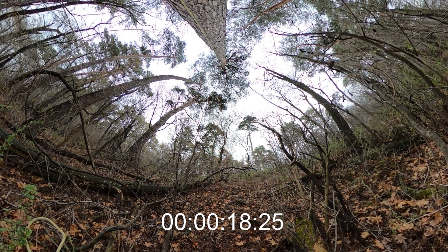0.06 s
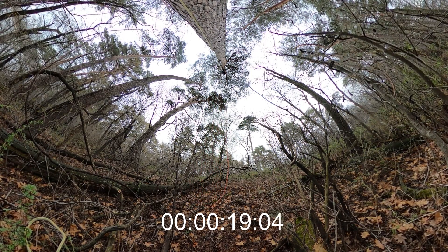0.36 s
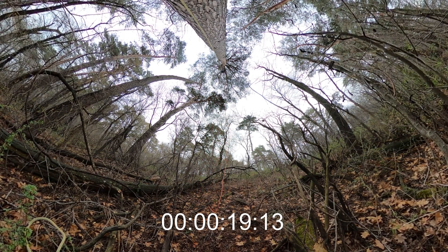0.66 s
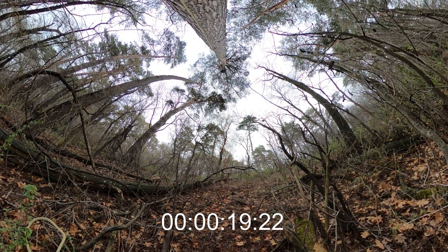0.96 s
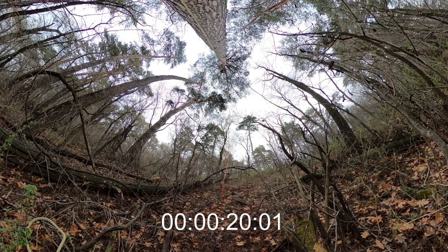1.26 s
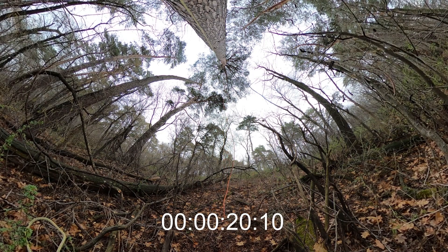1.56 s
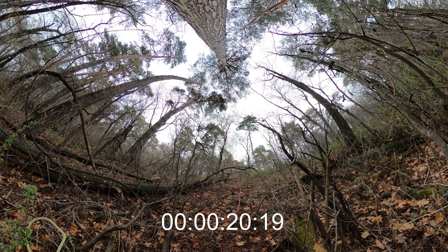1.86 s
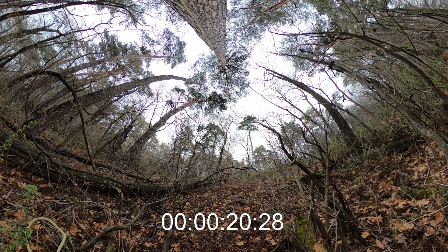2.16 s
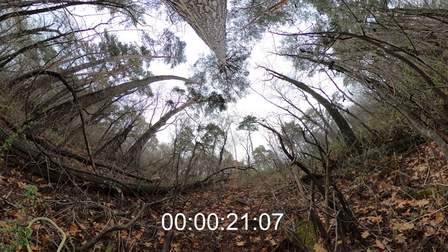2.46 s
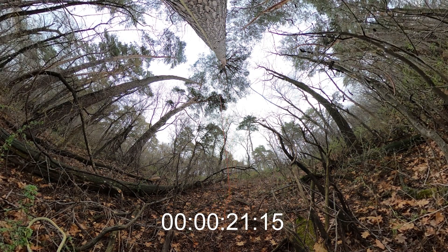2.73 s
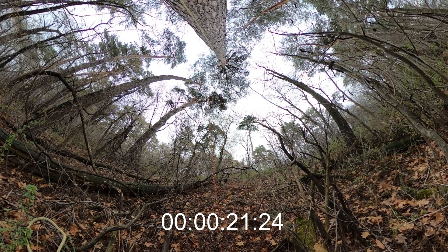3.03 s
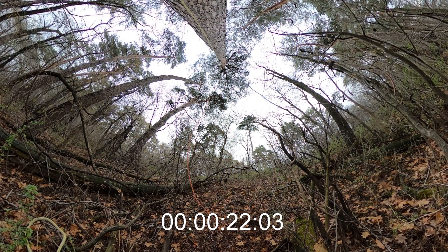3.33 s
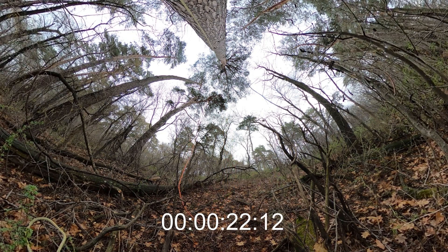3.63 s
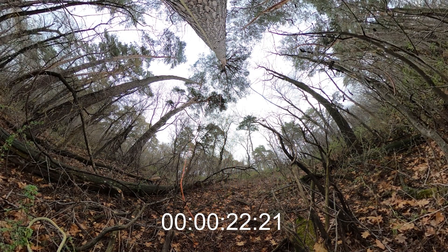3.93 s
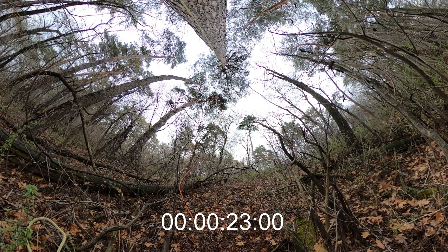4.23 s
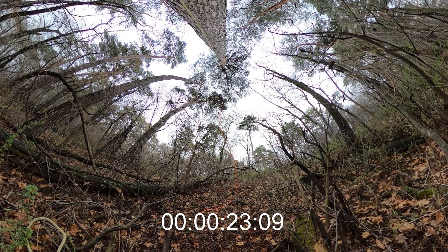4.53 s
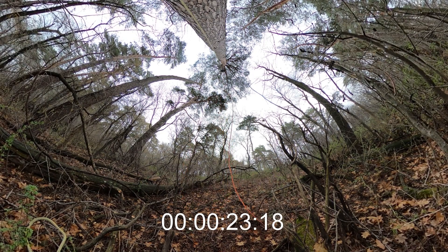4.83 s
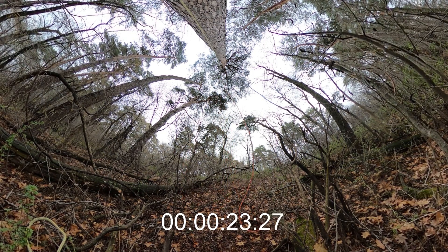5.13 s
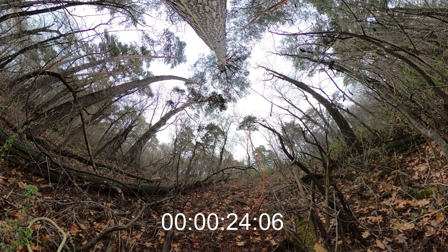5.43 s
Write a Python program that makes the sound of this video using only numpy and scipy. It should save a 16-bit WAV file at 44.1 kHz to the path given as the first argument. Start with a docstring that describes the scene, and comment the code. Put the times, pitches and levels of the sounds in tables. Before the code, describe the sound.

A straining tree trunk creaks and cracks irregularly, then branches snap close by and it thuds down, with faint birds and a low rumble behind.

```python
"""A winter forest, where a tree gives way. The strained trunk squeaks by stick-slip friction and cracks at
intervals, each big crack knocking through the ground just before it arrives through the air. Then
branches snap close by and the stem thuds down, overloading the microphone. Trunks scatter the sound
into a short echo. Far traffic rumbles over a low hum, small birds call and faint hoots come from afar."""
import sys
import numpy as np
from scipy import signal
from scipy.fft import rfft, irfft
from scipy.io import wavfile

SR = 44100
rng = np.random.default_rng(int(sys.argv[2]) if len(sys.argv) > 2 else 0)


def digitize_waveform(pressure):
    """Quantize a signal to 16-bit integers and store it at the path in sys.argv[1].

    Rows of a 2-D input are taken as channels; values are limited to [-1, 1].
    """
    field = np.atleast_2d(pressure).T
    bounded = np.clip(field, -1, 1)
    quanta = np.round(bounded * 32767).astype(np.int16)
    wavfile.write(sys.argv[1], SR, quanta)


N = 250884

# spectrum of far traffic: frequency_hz, relative_density_db
TRAFFIC_SPECTRUM = [(20, -4.5), (40, -4), (62, -1.5), (90, -5.5), (135, -9.5), (180, -12.5), (280, -18.5),
                    (420, -20.5), (700, -18.5), (1600, -20.5), (2400, -38), (5000, -48.5), (9500, -54),
                    (12000, -78)]
# course of the tyre noise: time_s, level_db
TYRE_LEVEL = [(0.0, -45.5), (0.58, -43.5), (1.62, -44.5), (2.23, -47), (2.81, -43), (3.13, -45.5),
              (3.55, -43), (3.98, -46.5), (4.29, -41.5), (4.45, -45), (5.1, -46)]
# course of the low hum: time_s, level_db
HUM_LEVEL = [(0, -38), (.6, -45.5), (1.2, -51), (2.0, -46.5), (2.8, -50.5), (3.3, -42), (3.8, -44),
             (4.5, -43), (5.69, -55)]
# faint low hoots: start_s, length_s, start_hz, end_hz, level_db
FAR_HOOTS = [(0.0, 0.046, 385, 395, -46), (.98, 0.18, 319.4, 334, -55), (4.62, 0.165, 335.5, 350, -52)]
# thin bird calls: start_s, length_s, start_hz, end_hz, relative_level_db
BIRD_CHIRPS = [(0.0, 0.017, 7530, 7400, -58.5), (.17, 0.081, 8970, 8800, -67),
               (0.905, 0.036, 7460, 7250, -60), (1.002, 0.05, 7400, 7250, -58),
               (1.087, 0.0043, 7480, 6820, -36.5), (1.095, 0.036, 7340, 7150, -51),
               (1.81, 0.048, 7880, 7830, -55), (1.825, 0.034, 7200, 6720, -60),
               (1.926, 0.057, 6920, 7630, -52), (2.663, 0.03, 7500, 7450, -53),
               (4.582, 0.021, 7250, 6860, -60), (4.726, 0.076, 7340, 7130, -60)]
# colour of the forest echo: frequency_hz, relative_gain_db
ECHO_SPECTRUM = [(200, 3.5), (600, -2), (1500, 2), (3000, 1), (6000, 1.5), (10000, 0), (15000, -1.5)]
# reverberation time of the forest: frequency_hz, t60_s
ECHO_DECAY = [(200, 0.55), (800, 0.24), (2000, 0.47), (5500, 0.5), (10000, 0.54), (15000, 0.44)]
# echo of the breaking wood, which sinks as the breaks come close: time_s, relative_gain_db
ECHO_SHARE = [(0, -4.5), (1.7, -3.5), (3.3, -2.5), (3.7, -10.5), (4.17, -9.5), (4.84, -4.5), (5.18, -3.5),
              (5.35, -16), (5.45, -20.5), (5.65, -16)]
# modes of the trunk: pitch_ratio, gain_db
TRUNK_MODES = [(0.759, -8), (0.999, 0), (1.42, -13.5), (2.05, -14.5), (2.9, -24), (3.9, -47)]
# blows carried by trunk and ground: start_s, mode_peak_db, base_pitch_hz, swell_s, relative_crunch_db
GROUND_KNOCKS = [(1.707, -19.5, 204, 0.0037, -10), (1.728, -29.5, 189.6, 0.014, -13),
                 (2.716, -32.5, 200, 0.0077, -2.5), (2.715, -31.5, 1024, 0.011, -20),
                 (3.683, -27, 242, 0.0022, 2), (4.149, -15.5, 249, 0.0066, -6),
                 (4.158, -28, 354, 0.0085, -15), (4.161, -20.5, 274.4, 0.012, -21),
                 (4.183, -21, 211.5, 0.014, -28), (5.442, -19.5, 234, 0.0034, -1),
                 (5.570, -27, 330, 0.0019, -10), (5.596, -18.5, 267, 0.0047, -16),
                 (5.634, 2, 244.3, 0.0089, -25), (5.660, -19, 258, 0.0084, -21)]
# limbs and stem hitting the soil: start_s, mode_peak_db, base_pitch_hz, swell_s, relative_crunch_db
SOIL_THUDS = [(4.150, -19.5, 75, 0.008, -24), (5.247, -27.5, 43.1, 0.05, -18),
              (5.325, -28.5, 75.2, 0.04, -37), (5.455, -12.5, 54, 0.0086, -34),
              (5.51, -22.5, 49, 0.011, -35), (5.578, -16.5, 93, 0.01, -12),
              (5.604, -0.5, 84.2, 0.012, -21.5), (5.646, 0, 46.2, 0.016, -20)]
# strained wood, by its strongest harmonic:
# start_s, end_s, start_hz, end_hz, level_db, relative_others_db, relative_echo_db, waver_ratio
WOOD_SQUEAKS = [(1.524, 1.613, 3210, 3180, -48.5, -22.5, -1.5, 0.0041),
                (1.595, 1.697, 3120, 3100, -42.5, -22, -5, 0.0057),
                (1.674, 1.795, 3127, 3010, -45, -27, -9.5, 0.013),
                (1.653, 1.787, 5560, 5410, -55.5, -37, -0.5, 0.021),
                (2.813, 2.905, 3350, 3530, -46.5, -25, -6, 0.015),
                (2.97, 3.067, 3765, 3650, -54, -22, -7, .003),
                (3.117, 3.326, 3700, 3730, -56.5, -14, -19, 0.0043),
                (3.44, 3.74, 3125, 3160, -57.5, -34, -3, 0.0062),
                (4.456, 4.49, 3380, 3440, -61, -24, 2, 0.026),
                (4.645, 4.683, 3400, 3600, -53, -16, -5, 0.044)]
# spells of fibres and twigs tearing: start_s, length_s, level_db
TEAR_SPELLS = [(0, 0.021, -51), (0.163, 0.072, -56), (0.302, 0.048, -53), (0.902, 0.014, -51),
               (0.971, 0.041, -48.5), (1.08, 0.098, -45), (1.165, 0.085, -55), (1.421, 0.038, -44.5),
               (1.584, 0.042, -44), (1.66, 0.28, -64), (1.952, 0.051, -52.5), (2.03, 0.19, -57),
               (2.54, 0.16, -49), (2.82, 0.038, -38), (2.884, 0.061, -50.5), (3.066, 0.027, -41.5),
               (3.27, 0.029, -40), (3.383, 0.21, -52), (3.658, 0.022, -35), (3.72, .012, -52),
               (3.967, 0.26, -55), (4.186, 0.081, -42.5), (4.448, 0.026, -50.5), (4.566, 0.23, -54.5),
               (4.85, 0.15, -57), (5.013, .03, -54.5), (5.177, 0.016, -33), (5.237, 0.045, -30),
               (5.346, 0.04, -35.5), (5.427, 0.061, -28.5), (5.56, 0.01, -21.5), (5.62, .03, -34.5)]
# colour of the tearing: frequency_hz, relative_gain_db
TWIG_SPECTRUM = [(500, -8), (1200, 4), (2200, 4.5), (3600, -2.5), (5500, 4.5), (7500, -1.5), (10000, -9.5),
                 (11500, -18), (15500, -37)]
# colour that all breaks share: frequency_hz, gain_db
WOOD_SPECTRUM = [(60, 16), (300, 6.5), (900, 10.5), (2500, 8), (6000, 5.5), (9700, 2.5), (12000, -13.5)]
# wood breaking: start_s, relative_level_db, pitch_hz, skirt_db_per_octave, decay_s
FRACTURES = [(0.373, -35.5, 5760, 15, .0016), (1.1115, -27, 8240, 16, 0.00069),
             (1.1857, -31.5, 3420, 7.5, .002), (1.193, -37.5, 4560, 6, .0024),
             (1.4283, -34.5, 2280, 10.5, 0.0031), (1.468, -35.5, 4840, 26, .0065),
             (1.6069, -33, 2720, 10, .0028), (1.725, -25.5, 1330, 6.5, 0.0051),
             (1.7322, -28, 1320, 7.5, 0.0017), (1.801, -33.5, 1480, 12, 0.0054),
             (1.993, -42, 5750, 18, .002), (2.0393, -43.5, 4670, 20, 0.0023),
             (2.1694, -32, 1300, 14, .0045), (2.596, -31.5, 2140, 9.5, 0.00085),
             (2.7485, -20, 5000, 5, 0.001), (2.7526, -17, 1490, 7.5, .002),
             (2.8288, -32.5, 5200, 10, 0.0075), (3.088, -27.5, 2720, 13, 0.00093),
             (3.285, -26, 1740, 4.5, .005), (3.2966, -30.5, 4500, 0.5, 0.0088),
             (3.351, -30, 2740, 10, .005), (3.3942, -36.5, 3100, 6, 0.0065), (3.5072, -29, 1270, 13, 0.012),
             (3.5396, -34.5, 1380, 9, 0.0039), (3.6736, -31, 4810, 11, 0.0065),
             (3.6782, -31, 6090, 9, 0.0044), (3.684, -22, 2200, 14, 0.0034), (3.727, -39, 3900, 14, .003),
             (3.8204, -38.5, 3460, 6, 0.01), (3.8678, -30, 4100, 10.5, 0.0026),
             (4.1671, -9, 2040, 17, 0.0016), (4.1737, -10.5, 1110, 7, 0.004),
             (4.1824, -19.5, 4500, 7.5, 0.00099), (4.1881, -26, 2200, 3.5, 0.014),
             (4.645, -45, 4200, 6, 0.0029), (4.778, -41, 6690, 5, 0.0022), (4.802, -39.5, 2580, 26, 0.0058),
             (4.837, -33.5, 1820, 2, 0.012), (5.025, -43.5, 4000, 4, 0.002),
             (5.1283, -38.5, 1350, 10.5, 0.005), (5.183, -26, 5570, 4.5, 0.0028),
             (5.2331, -25.5, 4400, 2.5, 0.0046), (5.2527, -24, 5530, 5, 0.0066),
             (5.2629, -36, 2010, 3, 0.0055), (5.2735, -24, 6760, 6, 0.0023),
             (5.2842, -14.5, 3230, 8, 0.0064), (5.3387, -16.5, 5700, 14.5, 0.0049),
             (5.347, -22.5, 4950, 11, 0.0046), (5.358, -31, 4070, 16, .0026),
             (5.4186, -24.5, 2050, 7, 0.0056), (5.4306, -27.5, 3360, 5, .0055),
             (5.442, -12, 1940, 25, .0016), (5.4429, -9, 1890, 9.5, 0.0071),
             (5.4516, -23.5, 2000, 1.5, 0.013), (5.4655, -19, 4740, 10, 0.011),
             (5.4783, -3, 3740, 30, 0.0045), (5.4803, -29, 4450, 13, 0.0055),
             (5.4869, -13.5, 3220, 32, 0.0013), (5.4923, -11.5, 3630, 27, .0035),
             (5.4963, -6.5, 4900, 12.5, 0.0032), (5.534, -26.5, 3800, 2.5, 0.0081),
             (5.5698, -7.5, 7650, 23, .002), (5.573, -12.5, 7450, 3.5, 0.0038),
             (5.6131, -19, 2560, 33, .0024), (5.6245, -8, 1350, 12, 0.0026),
             (5.627, -8.5, 1830, 15, 0.0054), (5.6339, -5.5, 1260, 12, 0.0048),
             (5.6482, -12.5, 1540, 11.5, 0.00065), (5.6539, -14, 1410, 17, 0.0025)]


def from_db(db):
    """Amplitude grows tenfold for every 20 dB."""
    return 10 ** (np.asarray(db) / 20)


def unit_rms(x):
    """Normalisation to unit mean power."""
    return x / np.sqrt(np.mean(x ** 2) + 1e-20)


def in_time(rows):
    """Linear interpolation of a time curve, one value a sample."""
    return np.interp(np.arange(N) / SR, *np.transpose(rows))


def at_hz(points, hz):
    """Interpolation on a logarithmic frequency axis."""
    frequencies, values = np.transpose(points)
    return np.interp(np.log(np.maximum(hz, 1)), np.log(frequencies), values)


def band(low_hz, high_hz, order=2):
    """Butterworth band-pass: a maximally flat passband."""
    return signal.butter(order, [low_hz, min(high_hz, .45 * SR)], "band", fs=SR, output="sos")


def coloured(x, spectrum):
    """Zero-phase filtering: multiplication in the frequency domain."""
    return irfft(rfft(x) * from_db(at_hz(spectrum, np.arange(N // 2 + 1) * SR / N)), N)


def causal(x, spectrum, size=4096):
    """Minimum-phase filtering colours a burst so that nothing sounds before its onset."""
    hz = np.arange(size // 2 + 1) * SR / size
    cepstrum = irfft(np.log(from_db(at_hz(spectrum, hz))))
    cepstrum[1:size // 2] *= 2
    cepstrum[size // 2 + 1:] = 0
    return irfft(rfft(x, size) * np.exp(rfft(cepstrum)))


def drift(rate_hz):
    """Random modulation: Gaussian values joined by straight lines."""
    knots = rng.standard_normal(400)
    return np.interp(np.arange(N) / SR * rate_hz, np.arange(len(knots)), knots)


def add(out, start_s, sound):
    """Superposition: a sound adds to what is already there."""
    i = max(round(start_s * SR), 0)
    out[i:i + len(sound)] += sound[:max(N - i, 0)]


def glide(length_s, start_hz, end_hz, waver):
    """Phase is the integral of a wavering frequency; returns it with a soft-edged envelope."""
    size = max(int(length_s * SR), 8)
    hz = np.linspace(start_hz, end_hz, size) * (1 + waver * drift(107)[:size])
    return 2 * np.pi * np.cumsum(hz) / SR, np.sqrt(2) * signal.windows.tukey(size, .35)


def traffic(rumble_db=-40):
    """Broadband noise of far traffic: rumble and tyre bands, each amplitude-modulated on its own."""
    noise = coloured(rng.standard_normal(N), TRAFFIC_SPECTRUM)
    rumble = unit_rms(signal.sosfilt(band(21, 313, order=3), noise))
    tyres = unit_rms(signal.sosfilt(band(215, 13000, order=3), noise))
    return from_db(rumble_db + 0.98 * drift(9.2)) * rumble + from_db(in_time(TYRE_LEVEL)) * tyres


def hum(pitch_hz=121.1):
    """A low sinusoid, slowly modulated in frequency and amplitude."""
    phase = 2 * np.pi * np.cumsum(pitch_hz + 0.876 * drift(4.25)) / SR
    return np.sqrt(2) * np.sin(phase) * from_db(in_time(HUM_LEVEL) + 0.35 * drift(11))


def calls(rows, waver, buzz_rad):
    """Near-pure gliding notes; rapid phase modulation adds sidebands, heard as a slight buzz."""
    out = np.zeros(N)
    for start_s, length_s, start_hz, end_hz, db in rows:
        phase, envelope = glide(length_s, start_hz, end_hz, waver)
        buzz = buzz_rad * drift(896)[:len(phase)]
        add(out, start_s, from_db(db) * envelope * np.sin(phase + buzz))
    return out


def forest_echo(feed, build_s=0.0013):
    """Multiple scattering from trunks: a tail that decays exponentially, at its own rate in each octave."""
    t, response = np.arange(int(.8 * SR)) / SR, 0
    scatter = rng.standard_normal(len(t))
    scatter = np.sign(scatter) * np.abs(scatter) ** 1.03   # strong reflections stand out slightly
    edges_hz = 125 * 2. ** np.arange(8)
    for low, high in zip(edges_hz, edges_hz[1:]):
        centre_hz = np.sqrt(low * high)
        octave = signal.sosfiltfilt(band(low, high), scatter)
        decay = np.exp(-np.log(1000) * t / at_hz(ECHO_DECAY, centre_hz))
        response = response + octave * from_db(at_hz(ECHO_SPECTRUM, centre_hz)) * decay
    response = response * (1 - np.exp(-t / build_s))
    return signal.fftconvolve(feed, response / np.sqrt(np.sum(response ** 2)))[:N]


def blows(rows, modes, crunch_top_hz):
    """An impact excites damped modes that swell and die, the high ones first, under a noisy crunch."""
    out, t = np.zeros(N), np.arange(SR // 4) / SR
    for start_s, peak_db, hz, swell_s, crunch_db in rows:
        swing = 0
        for ratio, db in modes:
            age = t / swell_s * np.sqrt(ratio)
            swing = swing - from_db(db) * age * np.exp(1 - age) * np.sin(2 * np.pi * hz * ratio * t)
        crunch_band = band(hz, max(crunch_top_hz, 3.3 * hz), order=4)
        grit = unit_rms(signal.sosfilt(crunch_band, rng.standard_normal(len(t))))
        age = 1.1 * t / swell_s
        crunch = from_db(crunch_db) * grit * age * np.exp(1 - age)
        add(out, start_s, from_db(peak_db) * (swing + crunch))
    return out


def squeaks():
    """Stick-slip friction, strongest at the slip rate's fourth harmonic; returns direct and echo feed."""
    direct, feed = np.zeros(N), np.zeros(N)
    for start_s, end_s, start_hz, end_hz, db, others_db, echo_db, waver in WOOD_SQUEAKS:
        phase, envelope = glide(end_s - start_s, start_hz, end_hz, waver)
        others = sum(np.sin(phase * k / 4) for k in (3, 5, 6, 7))
        grip_db = 1.6 * drift(68)[:len(phase)]   # the grip is uneven
        sound = from_db(db + grip_db) * envelope * (np.sin(phase) + from_db(others_db) * others)
        add(direct, start_s, sound)
        add(feed, start_s, from_db(echo_db) * sound)
    return direct, feed


def tearing(ticks_per_s=1400, spread_db=2.5, tick_q=1.4, rustle_db=-7, attack_s=0.0097, fade_db_per_s=420):
    """Fibres tear as a Poisson process of resonant ticks over a rustle; overlapping spells add in power."""
    power, t = np.zeros(N), np.arange(SR // 2) / SR
    for start_s, length_s, db in TEAR_SPELLS:
        fade_db = fade_db_per_s * np.maximum(t - length_s, 0)
        envelope = np.minimum(t / attack_s, 1) * from_db(db - fade_db)
        add(power, start_s, envelope ** 2)
    sizes = from_db(spread_db * np.minimum(rng.exponential(1, N), 4)) * rng.choice([-1, 1], N)
    clicks = sizes * (rng.random(N) < ticks_per_s / SR)
    pitches_hz = np.geomspace(900, 12500, 9)
    click_hz = rng.choice(pitches_hz, N)
    ticks = sum(signal.lfilter(*signal.iirpeak(hz, tick_q, fs=SR), clicks * (click_hz == hz) + 1e-18)
                for hz in pitches_hz)
    twigs = unit_rms(ticks) + from_db(rustle_db) * rng.standard_normal(N)
    return np.sqrt(power) * unit_rms(coloured(twigs, TWIG_SPECTRUM))


def fractures(ring_db=-12, ring_q=8, splinter_power=1.68, peak_octaves=.52, gain_db=-1):
    """Brittle fracture: a click, then failing fibres ring the branch; returns direct and echo feed."""
    direct, feed = np.zeros(N), np.zeros(N)
    t, onset_samples = np.arange(int(.04 * SR)) / SR, int(.004 * SR)
    click = signal.unit_impulse(len(t))
    grid_hz = np.geomspace(60, 12000, 40)
    for start_s, db, pitch_hz, skirt_db_per_octave, decay_s in FRACTURES:
        fibres = rng.standard_normal(len(t))
        volley = np.sign(fibres) * np.abs(fibres) ** splinter_power * np.exp(-t / decay_s)
        modes_hz = np.geomspace(1300, 6000, 5) * 2 ** rng.uniform(-0.2, 0.92, 5)
        rings = sum(signal.lfilter(*signal.iirpeak(hz, ring_q, fs=SR), volley) for hz in modes_hz)
        click_gain = min(from_db(-6.5) * 0.0018 / decay_s, 2)   # the quickest breaks are mostly click
        burst = unit_rms(volley) + from_db(ring_db) * unit_rms(rings) + click_gain * unit_rms(click)
        burst = burst / np.std(burst[:onset_samples])
        # a rounded spectral peak: high for thin twigs, low for thick limbs
        octaves_off = np.hypot(np.log2(grid_hz / pitch_hz), peak_octaves) - peak_octaves
        colour_db = db + gain_db + at_hz(WOOD_SPECTRUM, grid_hz) - skirt_db_per_octave * octaves_off
        colour = np.column_stack([grid_hz, colour_db])
        add(direct, start_s, causal(burst, colour))
        # the trees receive sound from all sides of the break, which evens out its fine colour
        add(feed, start_s, np.sqrt(np.sum(burst ** 2)) * causal(click, colour))
    return direct, feed


def scene(treble_width=0.03528):
    """Direct and scattered sound superpose, with a faint stereo width, mostly in the treble."""
    cracks, crack_feed = fractures()
    tears = tearing()
    squeal, squeal_feed = squeaks()
    knocks = blows(GROUND_KNOCKS, TRUNK_MODES, crunch_top_hz=1090)
    thuds = blows(SOIL_THUDS, modes=[(0.96, 0)], crunch_top_hz=395)
    birds = calls(BIRD_CHIRPS, waver=.008, buzz_rad=0.66)
    hoots = calls(FAR_HOOTS, waver=0.059, buzz_rad=.15)
    breaking_feed = from_db(in_time(ECHO_SHARE)) * (from_db(-1.5) * crack_feed + from_db(-2) * tears)
    echo = forest_echo(breaking_feed + from_db(-14) * knocks + squeal_feed + from_db(-3) * birds)
    tree = cracks + tears + knocks + thuds + squeal
    mono = traffic() + hum() + hoots + from_db(2.5) * birds + echo + tree
    side = treble_width * np.gradient(mono)   # differentiation favours the treble
    return np.array([mono + side, mono - side])


def record(dry, cutoff_hz=15900):
    """Overload clips the loudest swings flat; a steep low-pass then cuts the highest treble."""
    clipped = np.clip(dry, -1, 1)
    return signal.sosfilt(signal.ellip(10, .1, 70, cutoff_hz, fs=SR, output="sos"), clipped)


dry = scene()
out = record(dry)
digitize_waveform(out)
```